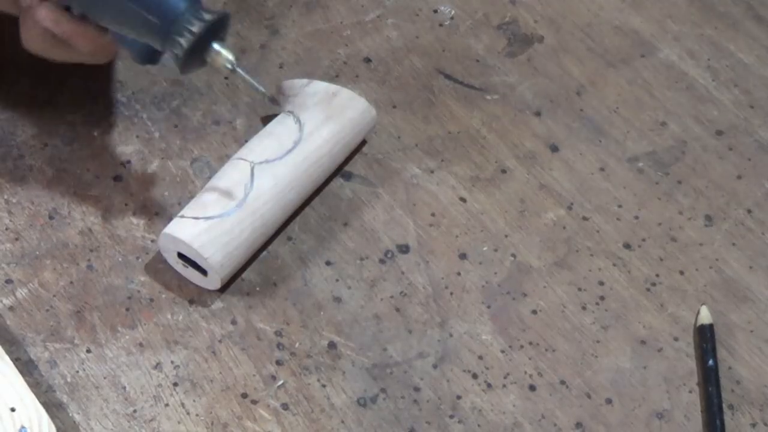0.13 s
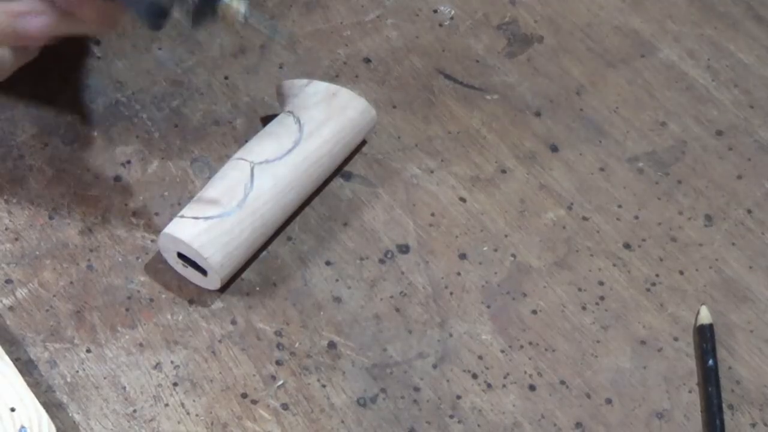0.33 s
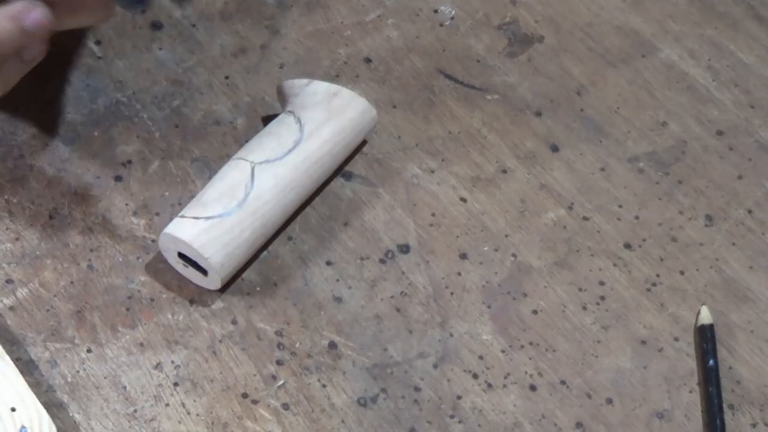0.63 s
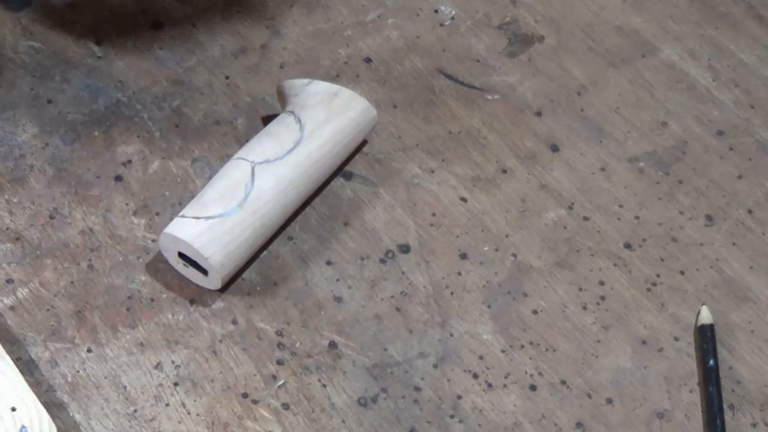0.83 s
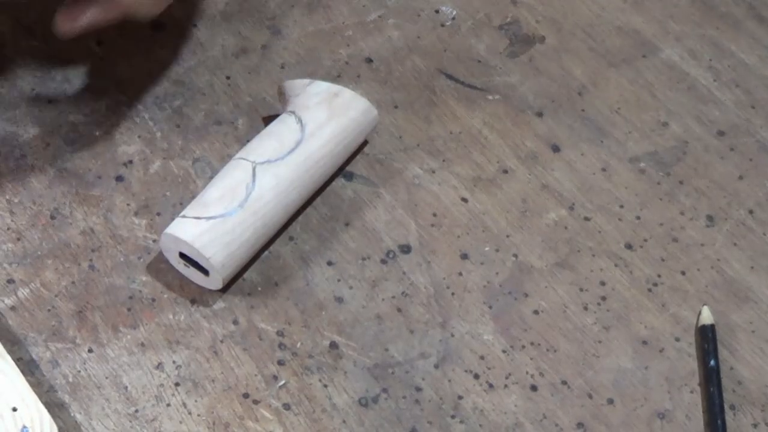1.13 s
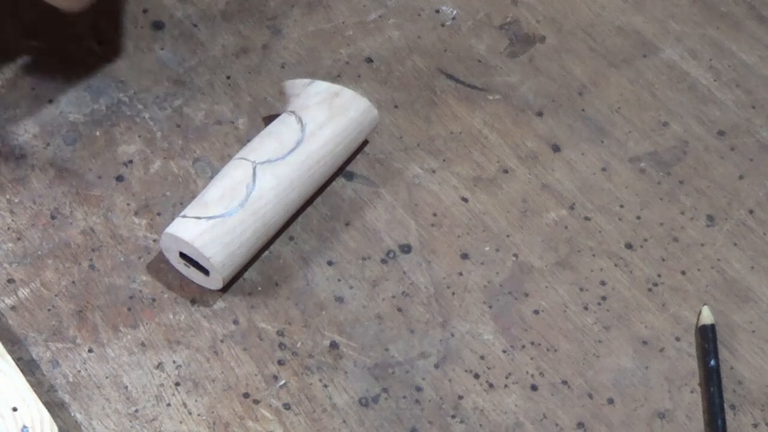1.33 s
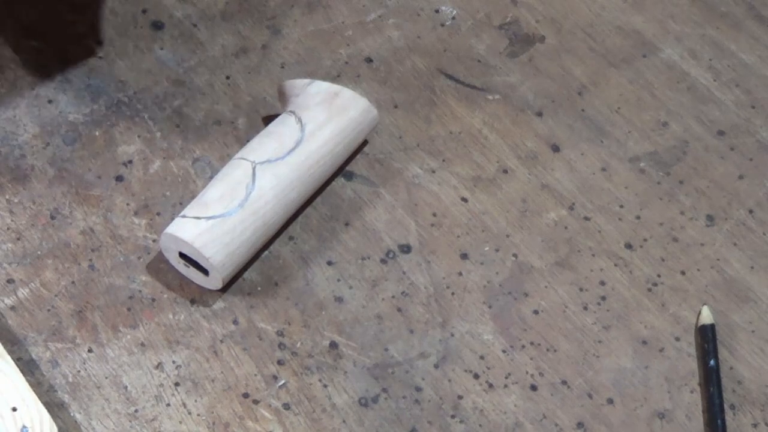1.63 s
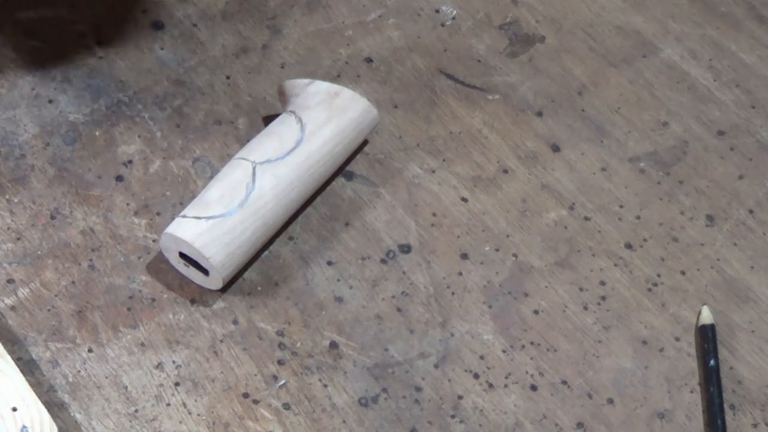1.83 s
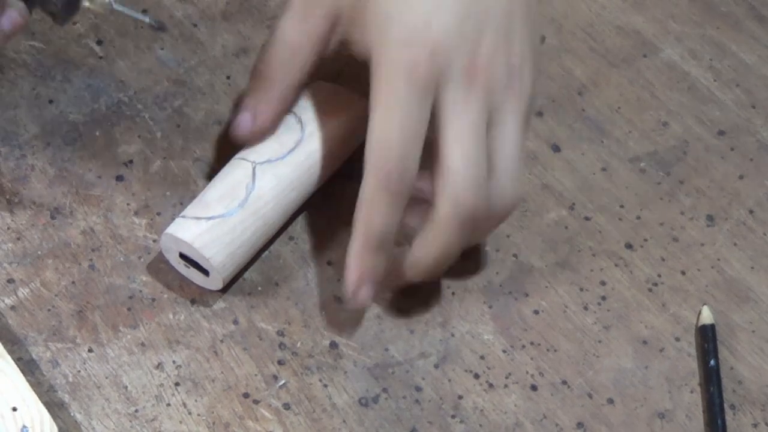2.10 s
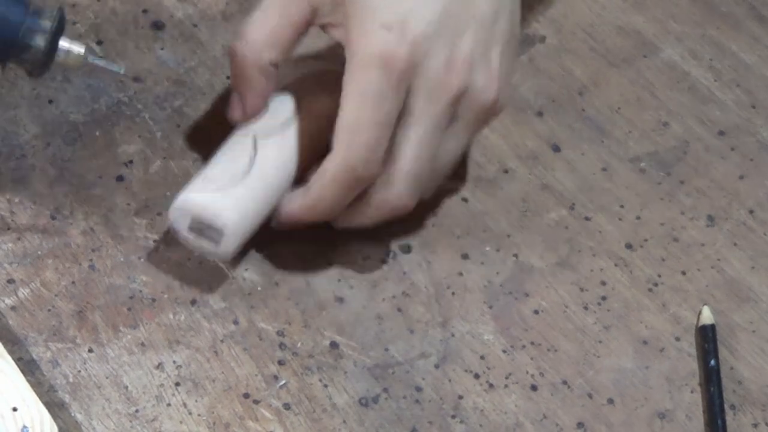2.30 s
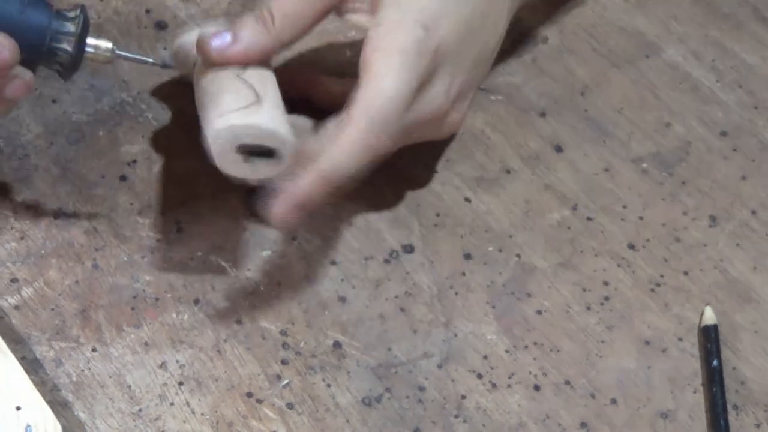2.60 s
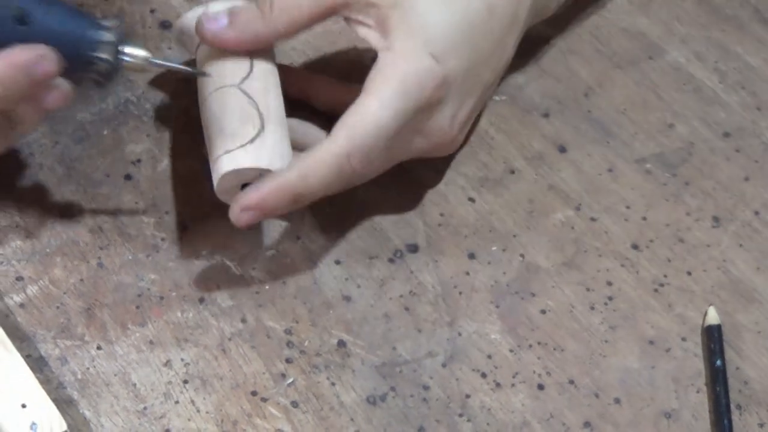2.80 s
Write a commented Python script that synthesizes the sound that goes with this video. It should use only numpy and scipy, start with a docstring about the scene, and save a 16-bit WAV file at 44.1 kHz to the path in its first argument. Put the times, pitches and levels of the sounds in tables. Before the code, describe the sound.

A handheld rotary tool runs freely with a high, rising whine and steady hiss.

```python
"""A handheld rotary tool spins up freely above a workbench, over mains hum and a faint room rumble.
First a brief metallic ring dies away, likely the bit just out of a cut. Harmonics of the shaft rate
(orders) climb through the hiss of fan and brushes, and a rasp, likely the bearing, comes in spells.
From 1.7 s the tool is moved aside and its hiss slowly turns hollow. At 2.1 s a hand takes hold of
a wooden handle, which knocks on the bench, while the tool runs on."""
import sys
import numpy as np
from scipy import signal
from scipy.io import wavfile
from scipy.ndimage import uniform_filter1d

SR = 44100
rng = np.random.default_rng(int(sys.argv[2]) if len(sys.argv) > 2 else 0)


def wav_record(signal):
    """Record a signal, one row per channel, as 16-bit PCM in the file named by sys.argv[1]."""
    frames = np.transpose(np.atleast_2d(signal))
    bounded = np.clip(frames, -1, 1)
    # unit amplitude maps onto the largest positive 16-bit level
    quanta = np.round(bounded * 32767).astype(np.int16)
    wavfile.write(sys.argv[1], SR, quanta)


N = 130095

# Decaying terms of the shaft's lag behind top speed: (initial shortfall [Hz], time constant [s])
SPEED_LAGS = [(17.08, .143), (123.36, .768), (62.77, 4.902)]
TOP_SPEED_HZ, JITTER_HZ, JITTER_PER_S = 430, 0.255, 32

# Leading shaft orders, which swell and fade as they climb through resonances: order -> (time [s], level [dB])
LEADING_ORDERS = { 1: [(0, -71.5), (.7, -63), (.92, -49), (1.07, -50.5), (1.25, -59), (1.45, -50.5),
                  (2.35, -52), (2.5, -48)], 3: [(0, -63), (1.1, -57), (2.2, -50.5), (2.7, -45)],
                  4: [(0, -61), (.63, -52), (.71, -39), (.78, -52), (1.4, -47), (2.95, -54)], 8: [(0, -64),
                  (.4, -47), (.9, -57), (1.12, -44.5), (1.55, -50), (1.88, -45), (2.06, -37), (2.2, -44),
                  (2.55, -39.5), (2.95, -41)], 15: [(0, -56), (1, -49), (1.35, -42.5), (2.95, -52)],
                  16: [(0, -58), (.17, -45), (.45, -52), (.56, -38.5), (.65, -50), (1.05, -48), (1.2, -35),
                  (1.7, -39), (2.95, -39)], 17: [(0, -55), (.95, -50), (1.2, -43), (2.95, -48)],
                  18: [(0, -63), (.34, -36), (.46, -58), (.9, -58), (1.2, -40), (1.5, -41), (2.95, -54)],
                  20: [(0, -61), (2.25, -48.5), (2.75, -34.5), (2.95, -36)], 23: [(0, -58), (.45, -44),
                  (.8, -41), (1, -39), (1.27, -55), (1.45, -37), (1.65, -46), (2.95, -41)], 26: [(0, -56),
                  (.38, -42), (1.05, -46), (2.5, -38), (2.8, -44)], 27: [(0, -54), (.85, -35.5),
                  (1.3, -37.5), (1.5, -49), (2.95, -50)], 28: [(0, -53), (.9, -40.5), (1.5, -53)],
                  30: [(0, -46), (2.25, -48), (2.55, -40.5), (2.75, -50)], 32: [(0, -45), (.36, -37),
                  (.7, -45), (2.95, -57)], }
# Other clear orders: order -> level before housing colour and spin-up gain [dB]
CLEAR_ORDERS = {19: -46, 24: -44, 29: -48.5, 35: -48}
FAINT_DB, FAINT_ORDERS, SPIN_UP_DB_PER_OCTAVE = -50.5, range(5, 42), 8
# Colour that the housing gives the clear and faint orders: (frequency [Hz], gain [dB])
HOUSING_RESPONSE = [(2400, -5.5), (4000, 0), (10000, 0), (15500, -2.5)]
WANDER, LEAD_WANDER, WANDER_PER_S = 0.67, 0.44, 11
FLARE_DB, LEAD_FLARE_DB, FLARE_PER_S = 3, 1, 6.8
SHUDDER, SHUDDER_PER_S, SHUDDER_EXPONENT = 0.85, 85, 0.55

# Spectrum of fan air and brush friction: (frequency [Hz], relative density [dB])
HISS_SPECTRUM = [(100, -36.5), (300, -16.5), (600, -14), (950, -5.5), (1250, -3.5), (1650, -8), (2000, -5),
                 (2400, -10.5), (3100, -4.5), (3900, -1.5), (4700, -5), (5400, -2.5), (7600, -3), (8500, 1),
                 (9700, 1.5), (11000, -3), (12500, -3), (14200, -7.5), (15700, -16)]
HISS_DB, BRUSH_DEPTH, BRUSH_SHARPNESS = -27.5, 0.14, 15
# Envelopes of the low, middle and treble hiss: (time [s], gain [dB])
LOW_HISS_GAIN = [(0, -1.5), (.3, 0), (.7, 1.5), (.85, -1.5), (1.9, 1), (2.95, 0)]
MID_HISS_GAIN = [(0, 0.62), (2.95, -1.44)]
TOP_HISS_GAIN = [(0, 2), (.28, 3), (0.418, -0.5), (.68, 3.5), (1.05, -1.5), (1.3, -3), (2, 0), (2.35, -1),
                 (2.95, -4.5)]
# Crossovers of these bands: (lower start [Hz], lower end [Hz], upper start [Hz], upper end [Hz])
CROSSOVERS = [2270, 4630, 9350, 11500]
# Hollow colour of the hiss with the tool moved aside: (frequency [Hz], gain [dB])
ASIDE_COLOUR = [(700, -1), (1150, 0), (1900, 2), (2450, -5), (3100, -0.5), (5000, -1), (10300, 0.5)]
# Span over which that colour sets in: (start [s], end [s])
ASIDE_SPAN = [1.7, 3.2]

# Spells of the rattle: (time [s], level [dB])
RATTLE_LEVEL = [(0, -54), (.3, -39), (.9, -44), (1.05, -32), (1.12, -41), (1.45, -37.5), (1.87, -36.5),
                (1.99, -48), (2.41, -52), (2.47, -37.5), (2.77, -34.5), (2.84, -39), (2.95, -42)]
# Housing resonances that it excites: (frequency [Hz], width [Hz], relative gain [dB])
HOUSING_MODES = [(1170, 380, -5), (1880, 280, -15), (3867, 360, 17.5)]
# Shift of those resonances with the grip: (time [s], frequency factor [ratio])
GRIP_SHIFT = [(.4, 0.96), (1.05, 0.86), (1.4, 1.034), (1.9, 1.01), (2.78, 0.98), (2.9, 0.92)]
RATTLE_SPREAD_DB, SCRAPE_DECAY_S, RATTLE_HIGHPASS_HZ = 3, 0.0017, 890

# Impacts of handle on bench: (time [s], gain [dB], relative bench mode level [dB], wood pitch [ratio])
IMPACTS = [(2.121, -36, -8, 0.816), (2.136, -47.5, 15, 1.05), (2.179, -39, -15, 1.005),
           (2.187, -32.5, -22, 1.04), (2.213, -37.5, -8, 0.93)]
# Modes of the wood: (frequency [Hz], relative level [dB], 60 dB decay time [s])
WOOD_MODES = [(206, -16, 0.071), (274, 9.5, 0.03), (596, 0.5, 0.032)]
BENCH_HZ, BENCH_T60_S, KNOCK_RISE_S, KNOCK_HIGHPASS_HZ = 115, 0.076, 0.0029, 95

# Partials of the mains hum: (frequency [Hz], level [dB])
HUM_PARTIALS = [(60, -79.5), (120, -68)]
# Spectrum of the room rumble: (frequency [Hz], relative density [dB])
RUMBLE_SPECTRUM = [(20, -5), (80, -5), (150, 10), (260, -17), (500, 4), (1500, -23)]

# Stereo width: (frequency [Hz], gain of the opposed part [dB])
STEREO_WIDTH = [(60, -28), (170, -22), (750, -10.5), (2300, -22.5), (3300, -15), (8000, -12.5),
                (12000, -17.5), (13500, -66)]
# Stereo balance: (frequency [Hz], left over right [dB])
STEREO_BALANCE = [(100, -1.5), (700, 1.7), (4400, 0.4), (8600, 4.5), (13000, -3)]


def whine(speed, turns):
    """Periodic rotation radiates harmonics; each wavers and flares as it slides through room echoes."""
    highest_lead = max(LEADING_ORDERS)
    spin_up_db = SPIN_UP_DB_PER_OCTAVE * np.log2(speed / speed.mean())
    shortfall = (TOP_SPEED_HZ - speed) / (TOP_SPEED_HZ - speed.mean())
    others = {order: CLEAR_ORDERS.get(order, FAINT_DB)
              for order in [*CLEAR_ORDERS, *FAINT_ORDERS] if order not in LEADING_ORDERS}
    partials = [(order, curve(level), LEAD_WANDER * 2 * order / highest_lead, LEAD_FLARE_DB)
                for order, level in LEADING_ORDERS.items()]
    partials += [(order, db + spin_up_db + at_hz(HOUSING_RESPONSE, order * speed), WANDER, FLARE_DB)
                 for order, db in others.items()]
    out = np.zeros((2, N))
    for order, db, wander, flare_db in partials:
        wavering = unit_rms((1 + wander * drift(WANDER_PER_S)) * flutter(flare_db, FLARE_PER_S))
        # The fast shudder is strongest in high orders and early in the spin-up.
        roughness = SHUDDER * (order / highest_lead) ** 2 * shortfall ** SHUDDER_EXPONENT
        shudder = (1 + roughness * drift(SHUDDER_PER_S)) / np.sqrt(1 + roughness ** 2)
        tone = amp(db) * shudder * np.exp(2j * np.pi * (order * turns + rng.random()))
        out += np.sqrt(2) * (stereo(wavering, drift(WANDER_PER_S), order * speed) * tone).real
    return out


def hiss(turns):
    """Fan turbulence and brush friction make broadband noise; its upper bands flare once a turn."""
    spectra, hz = noise_spectra(HISS_SPECTRUM, patch_db=1.5)
    aside = np.interp(np.linspace(0, N / SR, spectra.shape[-1]), ASIDE_SPAN, [0, 1])
    spectra = spectra * amp(aside * at_hz(ASIDE_COLOUR, hz))
    low = np.interp(hz, CROSSOVERS[:2], [1, 0])
    top = np.interp(hz, CROSSOVERS[2:], [0, 1])
    bands = [(low, LOW_HISS_GAIN), (1 - low - top, MID_HISS_GAIN), (top, TOP_HISS_GAIN)]
    air, middle, treble = (waveform(spectra * share) * amp(curve(gain)) * flutter(depth_db=0.6, per_s=35)
                           for share, gain in bands)
    flare = unit_rms(1 + BRUSH_DEPTH * np.exp(BRUSH_SHARPNESS * (np.cos(2 * np.pi * turns) - 1)))
    modulated = air * mains_throb(depth=0.22) + flare * (middle + treble)
    return amp(HISS_DB) * modulated / waveform(spectra).std()


def rattle(turns):
    """Forced resonance: an uneven scrape once a turn, likely a loose bearing, rings the housing."""
    strength = amp(RATTLE_SPREAD_DB * np.minimum(rng.standard_normal(N), 2))
    blows = np.diff(np.floor(turns), prepend=0) * strength * mains_throb(depth=0.53)
    envelope = signal.lfilter([1], [1, -np.exp(-1 / (SCRAPE_DECAY_S * SR))], blows)
    scrapes = highpass(envelope * rng.standard_normal((2, N)), RATTLE_HIGHPASS_HZ, order=2)
    ringing = sum(amp(db) * stereo(*resonate(scrapes, hz * curve(GRIP_SHIFT), width), hz)
                  for hz, width, db in HOUSING_MODES)
    return unit_rms(ringing) * amp(curve(RATTLE_LEVEL))


def metallic_ring(hz=5220, width_hz=90, level_db=-36, fade_s=0.065):
    """A narrow resonance, likely of the bit just out of the cut, dies away at the start."""
    tone = resonate(rng.standard_normal(N), np.full(N, hz), width_hz)
    return amp(level_db) * unit_rms(tone) * np.exp(-(np.arange(N) / SR / fade_s) ** 2)


def handle_knocks():
    """Impacts excite damped modes of wood and bench as the handle rocks under the closing hand."""
    out, t = np.zeros(N), np.arange(SR // 2) / SR
    for start, db, bench_db, pitch in IMPACTS:
        modes = [(hz * pitch, level, t60) for hz, level, t60 in WOOD_MODES]
        modes.append((BENCH_HZ, bench_db, BENCH_T60_S))
        ringing = sum(amp(level - 60 * t / t60) * np.sin(2 * np.pi * hz * t) for hz, level, t60 in modes)
        out[round(start * SR):][:len(t)] += amp(db) * ringing * (1 - np.exp(-t / KNOCK_RISE_S))
    return highpass(out, KNOCK_HIGHPASS_HZ, order=3)


def room(rumble_db=-67):
    """Harmonics of the mains frequency hum over a faint low-frequency noise."""
    t = np.arange(N) / SR
    hum = sum(np.sqrt(2) * amp(db) * np.sin(2 * np.pi * (hz * t + rng.random()))
              for hz, db in HUM_PARTIALS)
    rumble, _ = noise_spectra(RUMBLE_SPECTRUM, patch_db=5)
    return hum + amp(rumble_db) * unit_rms(waveform(rumble))


def mains_throb(depth, hz=120):
    """Amplitude modulation: the motor's drive throbs with each half wave of the mains."""
    return 1 + depth * np.cos(2 * np.pi * hz * np.arange(N) / SR)


def resonate(x, hz, width_hz):
    """Heterodyning: shift down by the curve hz, low-pass and shift back to get a moving resonance."""
    carrier = np.exp(2j * np.pi * np.cumsum(hz) / SR)
    pole = np.exp(-2 * np.pi * width_hz / SR)
    return (carrier * signal.lfilter([(1 - pole) ** 2], [1, -2 * pole, pole ** 2], x / carrier)).real


def noise_spectra(spectrum, patch_db, patch_hz=500, patch_s=0.12):
    """Spectral shaping: stereo short-time noise spectra with drifting patches, and their frequencies."""
    frames, hz = N // 256 + 5, np.fft.rfftfreq(1024, 1 / SR)
    mid_re, mid_im, side_re, side_im, patches = rng.standard_normal((frames, 513, 5)).T
    patches = uniform_filter1d(patches, round(patch_hz / hz[1]), axis=0)
    patches = unit_rms(uniform_filter1d(patches, round(patch_s * SR / 256), axis=1))
    hz = hz[:, None]
    noise = stereo(mid_re + 1j * mid_im, side_re + 1j * side_im, hz)
    return noise * amp(at_hz(spectrum, hz) + patch_db * patches), hz


def waveform(spectra):
    """Overlap-add synthesis turns short-time spectra into sound."""
    return signal.istft(spectra, nperseg=1024, noverlap=768)[1][:, :N]


def stereo(mid, opposed, hz):
    """Sum and difference of a shared and an opposed part give left and right."""
    side = opposed * amp(at_hz(STEREO_WIDTH, hz))
    lean = amp(at_hz(STEREO_BALANCE, hz) / 2)
    return np.array([(mid + side) * lean, (mid - side) / lean])


def flutter(depth_db, per_s):
    """Random amplitude modulation: a smooth gain that conserves mean power."""
    return unit_rms(amp(depth_db * np.clip(unit_rms(drift(per_s).real), -2, 2)))


def drift(per_s):
    """Low-passed complex Gaussian noise gives a smooth fluctuation of unit rms."""
    times = np.linspace(0, N / SR, 1024)
    rates = np.fft.fftfreq(1024, times[1])
    white = rng.standard_normal(1024) + 1j * rng.standard_normal(1024)
    smooth = np.fft.ifft(np.fft.fft(white) * np.exp(-(rates / per_s) ** 2))
    return np.interp(np.arange(N) / SR, times, unit_rms(smooth))


def highpass(x, hz, order):
    """A maximally flat filter attenuates what lies below hz."""
    return signal.sosfilt(signal.butter(order, hz, "highpass", fs=SR, output="sos"), x)


def curve(points):
    """Linear interpolation of (time [s], value) points over the scene."""
    return np.interp(np.arange(N) / SR, *np.transpose(points))


def at_hz(points, hz):
    """Interpolation of (frequency [Hz], value) points on a logarithmic axis."""
    frequencies, values = np.transpose(points)
    return np.interp(np.log(hz + 1), np.log(frequencies), values)


def amp(db):
    """Amplitude ratio of a level in decibels."""
    return 10 ** (np.asarray(db) / 20)


def unit_rms(x):
    """Normalisation to an rms of one."""
    return x / np.sqrt(np.mean(abs(x) ** 2) + 1e-20)


def scene():
    """Superposition of all sources; one shaft, nearing top speed, drives whine, hiss and rattle."""
    t = np.arange(N) / SR
    lag_hz = sum(shortfall * np.exp(-t / tau) for shortfall, tau in SPEED_LAGS)
    speed = TOP_SPEED_HZ - lag_hz + JITTER_HZ * drift(JITTER_PER_S).real
    turns = np.cumsum(speed) / SR
    return whine(speed, turns) + hiss(turns) + rattle(turns) + metallic_ring() + handle_knocks() + room()


def record(dry):
    """Band limiting: a linear-phase low-pass removes the highest treble."""
    lowpass = signal.firwin(601, cutoff=15730, window=("kaiser", 9), fs=SR)
    return signal.oaconvolve(dry, lowpass[None], "same")


dry = scene()
out = record(dry)
wav_record(out)
```